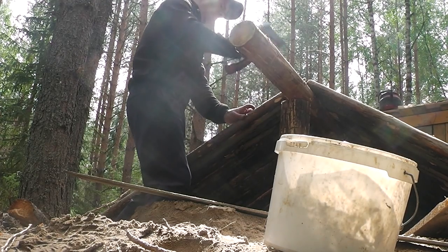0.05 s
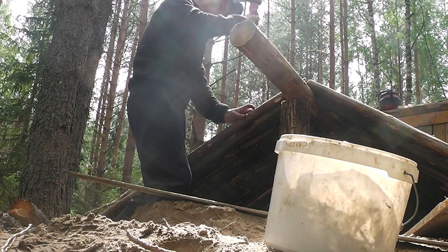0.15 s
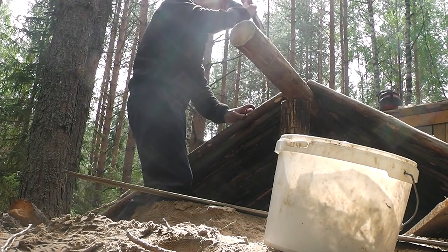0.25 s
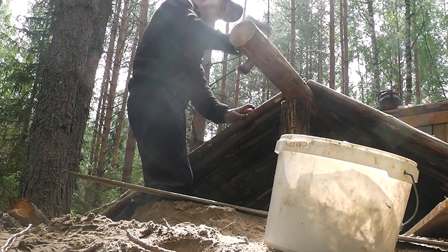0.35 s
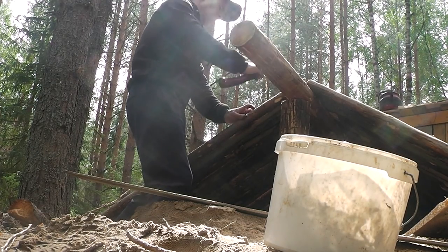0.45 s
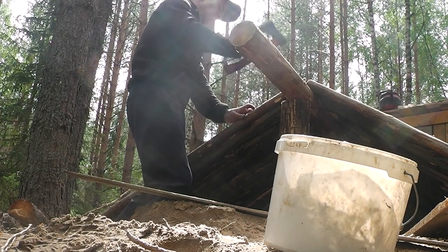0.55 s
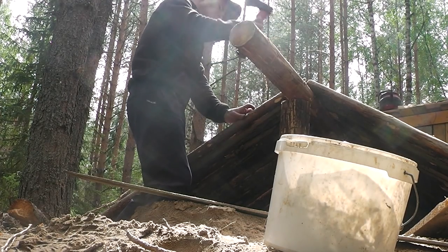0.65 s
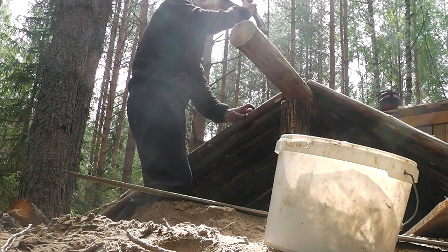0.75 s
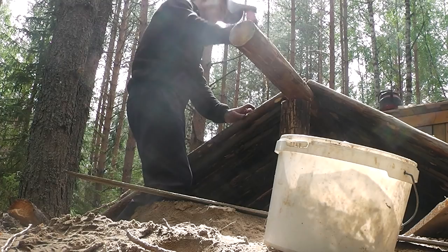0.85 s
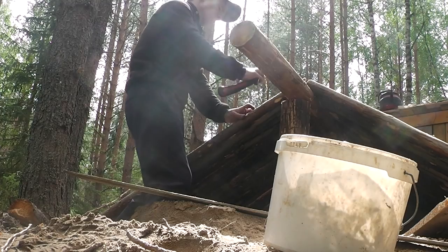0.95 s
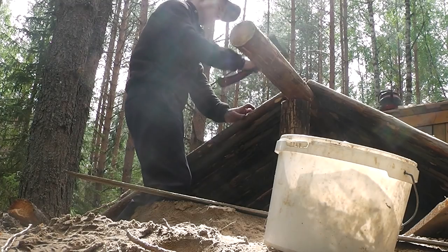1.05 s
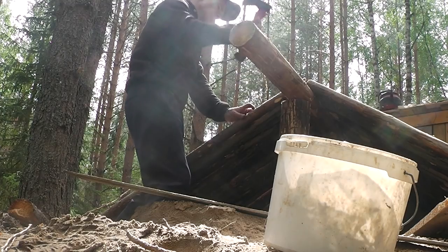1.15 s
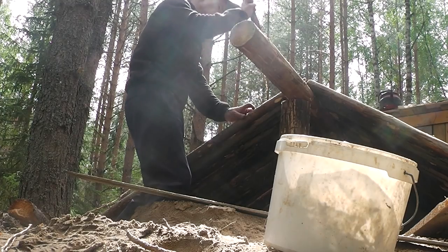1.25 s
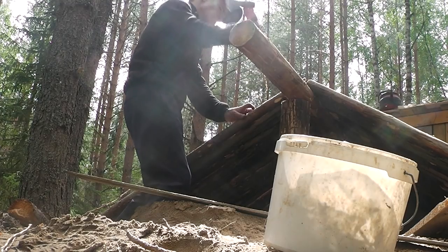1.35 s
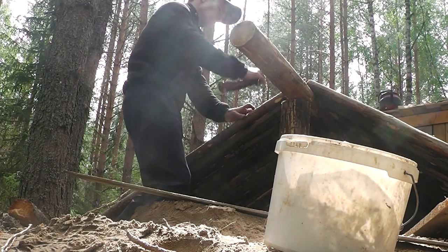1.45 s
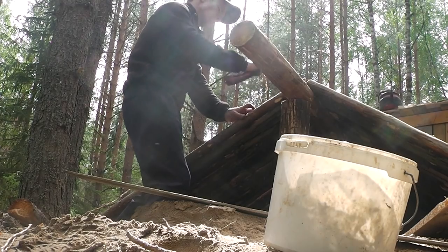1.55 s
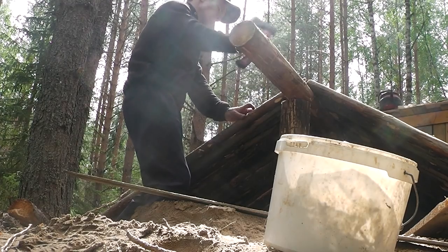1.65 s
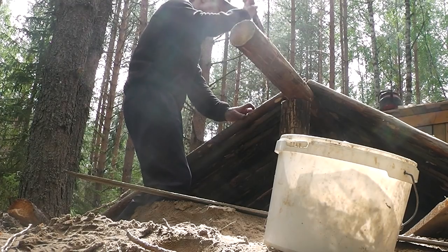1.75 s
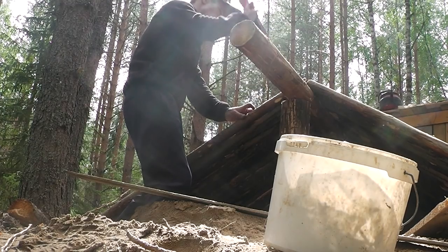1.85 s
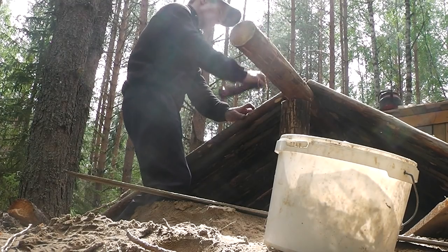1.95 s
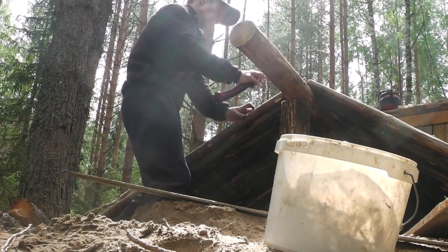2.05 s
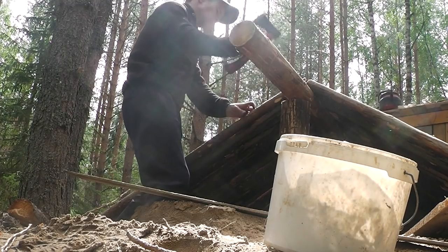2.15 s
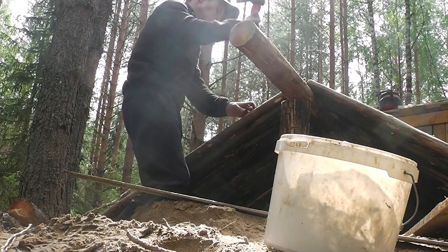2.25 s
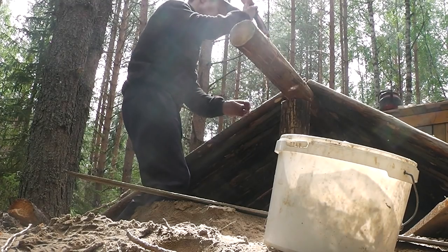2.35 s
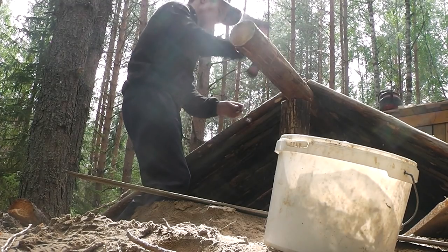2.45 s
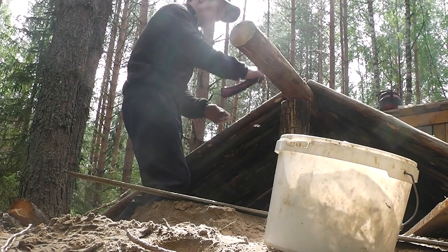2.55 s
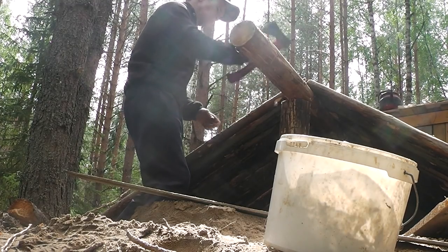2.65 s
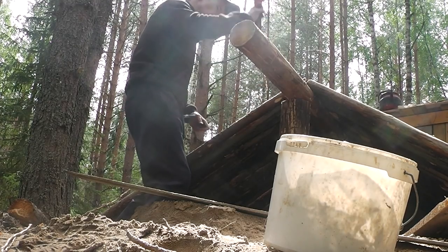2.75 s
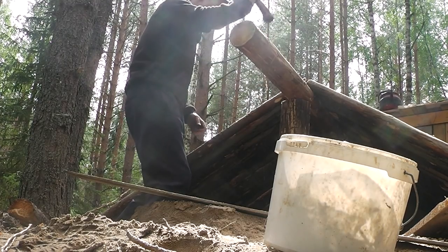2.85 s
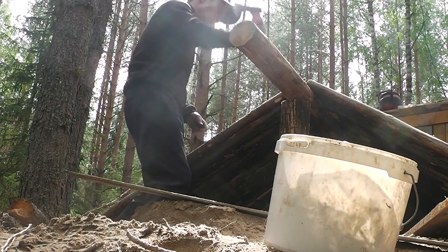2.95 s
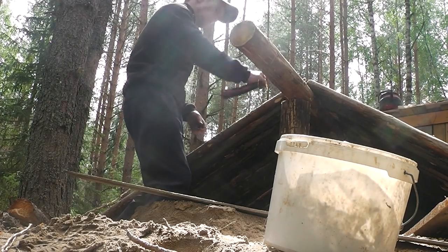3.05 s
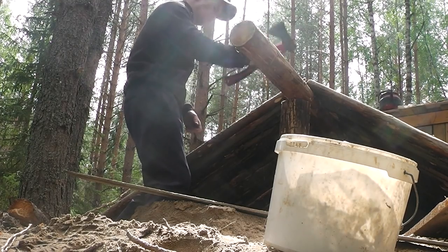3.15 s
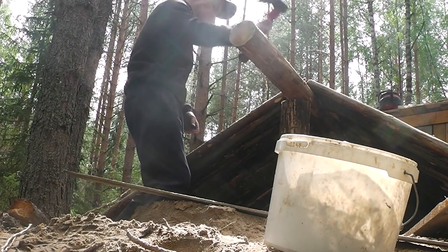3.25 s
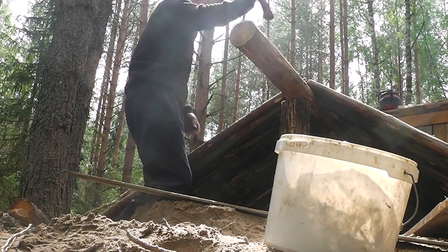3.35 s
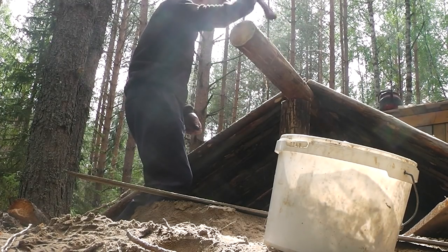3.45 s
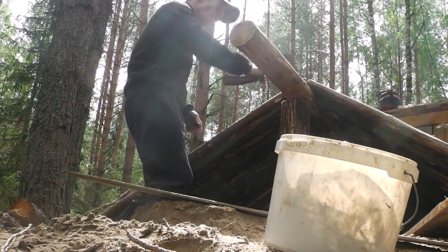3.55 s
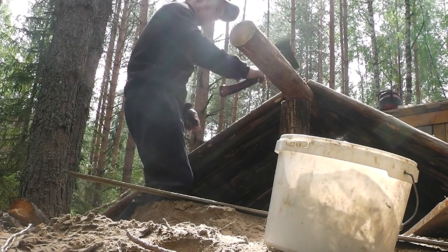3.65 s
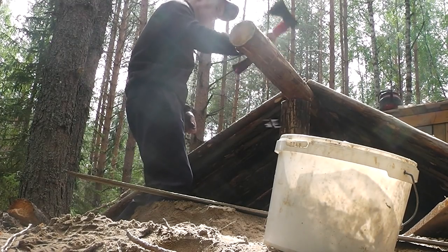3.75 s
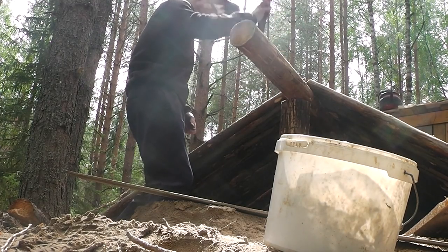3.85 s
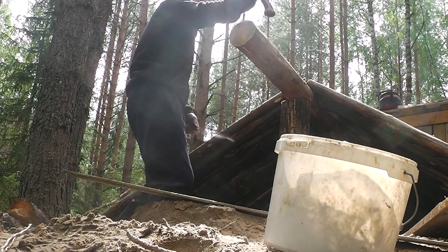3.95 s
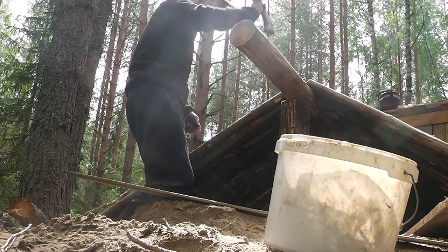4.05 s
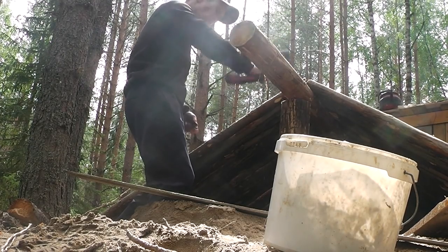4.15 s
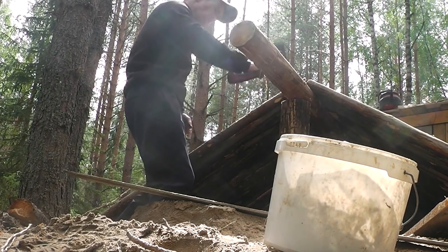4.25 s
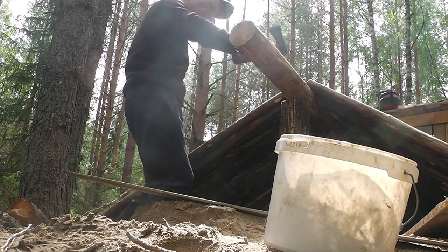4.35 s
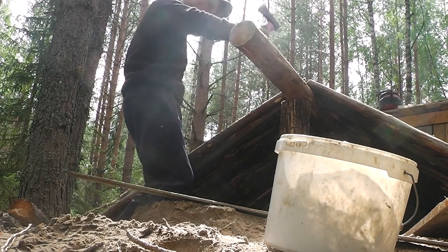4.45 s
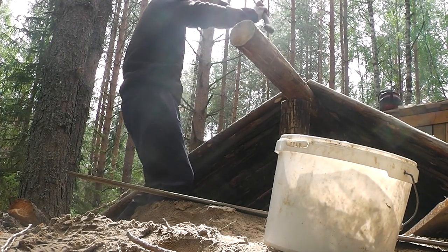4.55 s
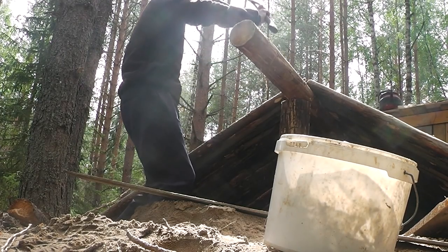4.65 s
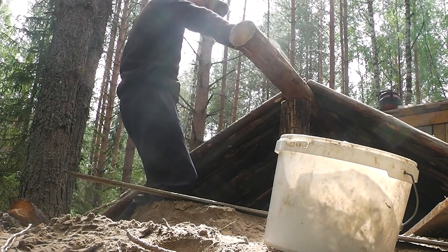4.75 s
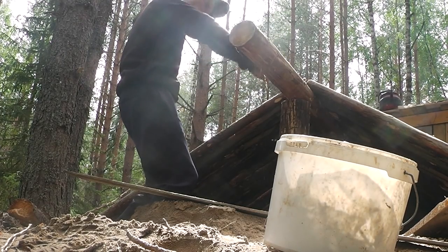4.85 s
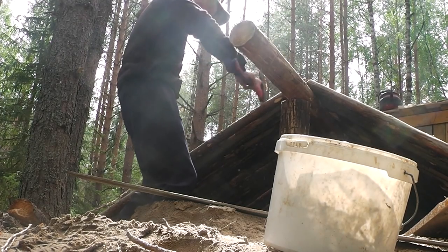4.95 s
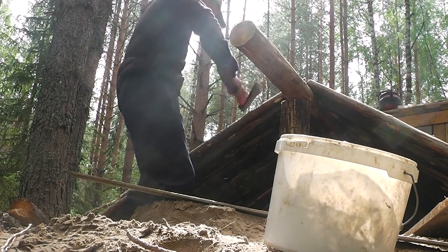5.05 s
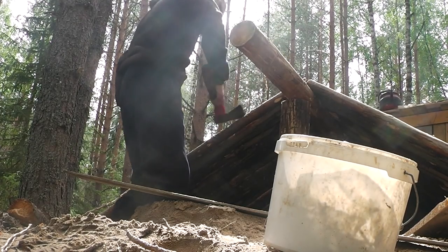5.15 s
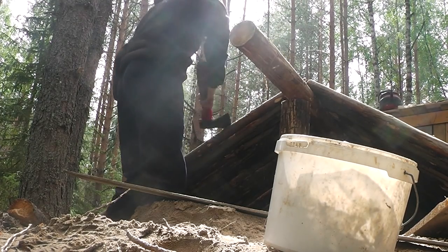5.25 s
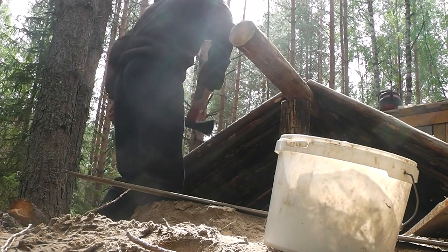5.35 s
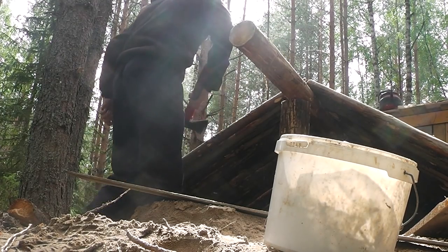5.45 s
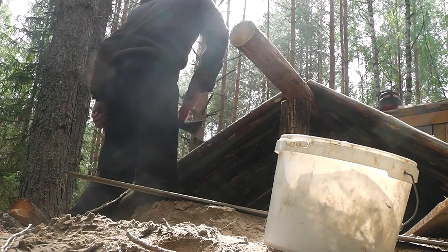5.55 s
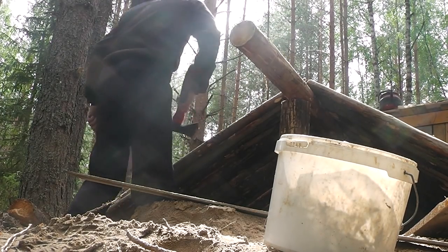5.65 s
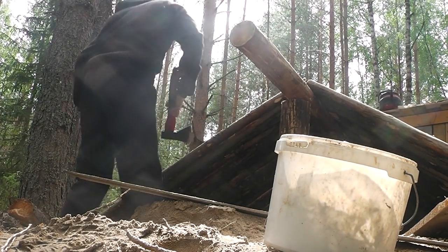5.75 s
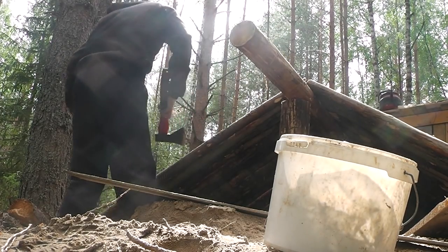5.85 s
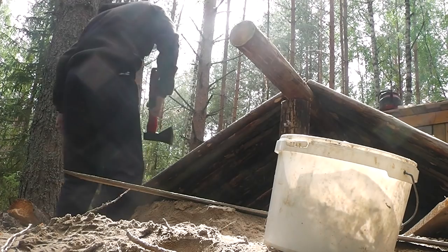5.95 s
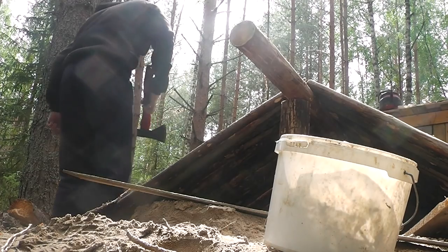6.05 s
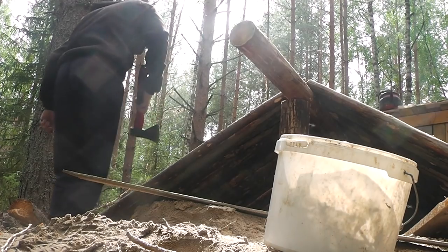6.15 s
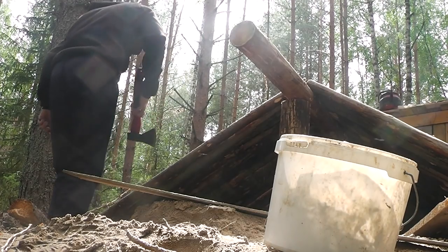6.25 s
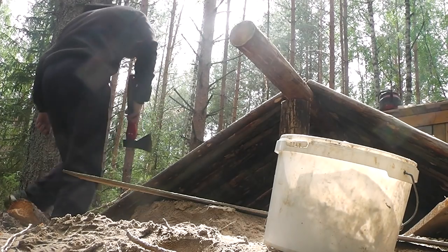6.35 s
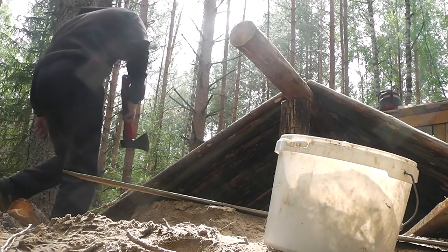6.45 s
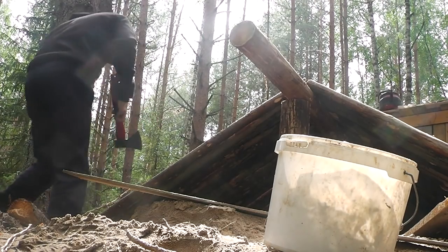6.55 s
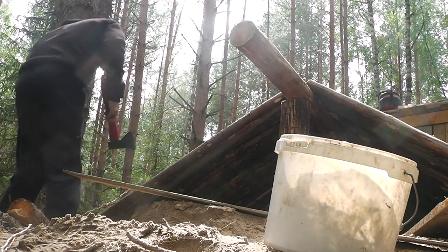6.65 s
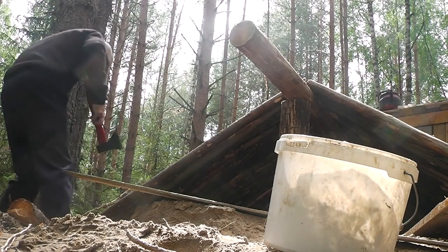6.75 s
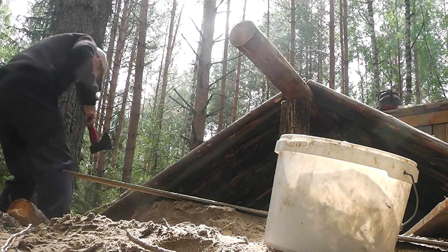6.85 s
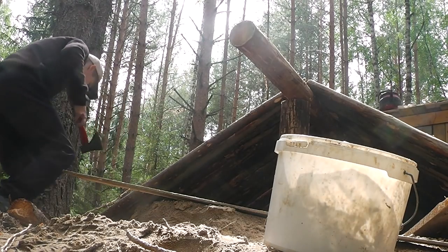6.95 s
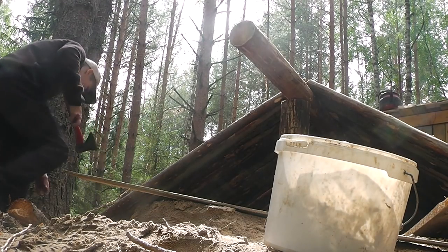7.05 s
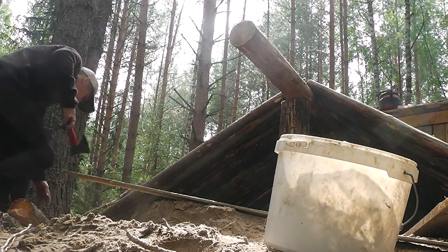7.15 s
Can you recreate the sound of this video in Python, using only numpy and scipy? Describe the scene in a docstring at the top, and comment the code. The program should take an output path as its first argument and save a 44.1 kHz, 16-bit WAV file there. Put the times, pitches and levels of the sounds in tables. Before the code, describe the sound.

Close outdoors in a quiet forest, a hatchet strikes a solid log ten times at roughly half-second intervals, each blow a sharp crack with woody ring and low boom. Middle blows clink with steel. The last, slightly delayed, splits with a bright snap; a chip thuds, the hatchet softly knocks timber and chatters, then faint footfalls press the litter. Trees hush and echo.

```python
"""A hatchet strikes the ridge log of a low timber hut in a pine forest, ten times, about twice a second.
Each blow sums a bell-shaped thump, a crack of shaped noise, ringing modes of wood and steel, a shudder and a boom.
Then a cut chip thuds down, the lowered hatchet knocks the timber once, softly, and chatters, and three footfalls
of filtered noise press the forest litter; small bright snaps fall throughout, during the blows and after them.
Hut, trunks and deep forest answer with decaying noise echoes; a steady hush of trees surrounds the microphone."""
import sys
import numpy as np
from scipy import signal
from scipy.fft import rfft, irfft
from scipy.io import wavfile
from scipy.ndimage import uniform_filter1d, minimum_filter1d

SR = 44100
rng = np.random.default_rng(int(sys.argv[2]) if len(sys.argv) > 2 else 0)


def output_pcm(signal):
    """Save a mono or channel-first signal as 16-bit PCM at the path in sys.argv[1].

    Samples are clipped to [-1, 1] before scaling.
    """
    pcm = np.clip(np.atleast_2d(signal).T, -1, 1) * 32767
    wavfile.write(sys.argv[1], SR, np.round(pcm).astype(np.int16))


N = 317520
LEAD_IN = SR // 10   # samples ahead of time zero, where the first blow already falls

# Modes of the steel hatchet head. Each row: frequency in Hz, level in dB, t60 in seconds.
STEEL = [(4957, -41, .23), (9109, -45, .23)]
# Side against mid for sound from the hut. Each row: frequency in Hz, level in dB.
WIDTH = [(60, -29.5), (300, -25), (1000, -25), (3000, -17.5), (8000, -13.5), (11000, -7), (14000, -2)]


def hatchet():
    """Each blow drives the log, tears its fibres, shakes the hut and sets the steel head ringing."""
    # Blows on the log. Each row: time in seconds, bite of the blade in dB, ring of the log in dB,
    # kick-back share from 0 to 1, hollowness in dB, ring of the steel in dB.
    blows = [(-0.024, -0.5, 4.5, 0.86, -1, -19.5), (0.5035, 4.5, 10.5, 1, -4.5, -15),
             (1.0138, 4.5, 11.5, 0.58, -0.5, -9), (1.5334, 9.5, 10.5, 0.4, -4, 13.5),
             (2.0498, 11.5, 7.5, 0.15, -14, 19), (2.5880, 7.5, 12, 0, -14.5, 2),
             (3.1181, 6, 10.5, .2, -11, -2.5), (3.6581, 9, 14.5, 0, -7.5, -14),
             (4.2361, 7, 10.5, 0.29, 8.5, -11), (4.8786, 5, 12.5, 1, 8, -19)]
    # Bright zings that hang among the trees. Each row: start in seconds, pitch in Hz, level in dB.
    zings = [(-0.024, 5040, -49), (0.5033, 5590, -39.5), (1.012, 6310, -43)]
    # Level of the treble. Each row is one side, left then right: gain in dB.
    treble_pan_db = [
        [0.26],
        [0.87],
    ]
    treble_pan = from_db(treble_pan_db)
    crack_db, shudder_db = 2.0, -46.5   # against the bite
    # Upper wood modes in a clean cut; a full kick-back raises them and shakes the roof timbers harder.
    bright_db, kick_bright_db, kick_rattle_db = -3.5, 6.5, 5.5
    # Crack tilt in dB/octave: at first, lost as the notch deepens, lost besides as the last blow breaks through.
    first_tilt_db, dulling_db, split_dulling_db = 4.0, 3.5, 4.5
    boom_db, boom_loss_db = -38, 7.5   # the boom weakens as the notch deepens
    high_steel_db = -20

    out = np.zeros((2, N + LEAD_IN))
    notch_depths = np.linspace(0, 1, len(blows))
    for depth, (s, bite_db, ring_db, kick, hollow_db, steel_db) in zip(notch_depths, blows):
        start = s - .002   # the thump is centred 2 ms into its sound
        bite = from_db(bite_db)
        tilt_db = first_tilt_db - dulling_db * depth - split_dulling_db * (depth == 1)
        tearing = crack(fibres(tilt_db, patchy_db=2.5), t60=.026)
        steel_gains_db = np.array([steel_db, high_steel_db])
        add(out, start, bite * thump(contact_ms=0.32, kick=kick, kick_after_ms=4.8447))
        add(out, start - .0003, bite * treble_pan * from_db(crack_db) * tearing)
        add(out, s, timber(ring_db, hollow_db, bright_db + kick_bright_db * kick))
        add(out, s, bite * from_db(kick_rattle_db * kick) * rattle())
        add(out, s, bite * from_db(shudder_db) * shudder())
        add(out, s, from_db(boom_db - boom_loss_db * depth) * boom())
        add(out, s, treble_pan * ring(STEEL, steel_gains_db, spread_db=1, detune=0))
    for s, hz, db in zings:
        add(out, s, from_db(db) * zing(hz))
    return out


def thump(contact_ms, kick, kick_after_ms):
    """A bell-shaped force radiates as its second derivative; the log kicks back just after. Centred on 2 ms."""
    ms = np.arange(SR // 80) * 1000 / SR - 2
    first = (ms / contact_ms) ** 2
    second = ((ms - kick_after_ms) / contact_ms) ** 2
    blow = (first - 1) * np.exp(-first / 2)
    kick_back = (second - 1) * np.exp(-second / 2)
    return blow + kick * kick_back


def fibres(tilt_db, patchy_db, count=45):
    """Each blow tears other fibres, so each crack has peaks and dips of its own."""
    # Mean spectrum of the crack before tilt. Each row: frequency in Hz, relative level in dB.
    crack_spectrum = [(700, 5.5), (1500, 14), (2100, 6), (2800, 3.5), (4000, 6), (6000, 7.5), (7600, 10),
                      (8300, 5.5), (9000, 14.5), (9700, 7.5), (11000, 5), (13500, -4.5), (16000, -15.5)]
    hz, db = np.transpose(crack_spectrum)
    grid = np.linspace(hz[0], hz[-1], count)
    smooth = np.interp(np.log(grid), np.log(hz), db) + tilt_db * np.log2(grid / 7000)
    return np.transpose([grid, smooth + patchy_db * rng.standard_normal(count)])


def crack(spectrum, t60, size=2048, count=3):
    """A click scattered over a few ms; its spectrum stays smooth. Starts after 2 ms."""
    t = np.arange(size) / SR - .002
    shape = (t > 0) * fade(np.abs(t), t60)
    x = rng.standard_normal((2, size)) * np.sqrt(shape)
    for _ in range(count):   # shorten in time, then flatten the spectrum, keeping only the phase
        x = irfft(np.exp(1j * np.angle(rfft(x * np.sqrt(shape)))))
    mid, side = colour(x, spectrum)
    stereo = mid + colour(side, WIDTH) * [[1], [-1]]
    return stereo * np.hanning(2 * size)[size:]


def timber(ring_db, hollow_db, bright_db):
    """The log rings; the spot that is hit weights its hollow low modes and its bright upper ones."""
    # Modes of the log and the roof it rests on. Each row: frequency in Hz, level in dB, t60 in seconds.
    wood = [(81.9, -30, 0.15), (128, -31.5, 0.12), (194.65, -31.5, 0.078), (266.53, -34.5, 0.15),
            (347.8, -27.5, 0.087), (409.45, -26, 0.11), (474.3, -45, 0.27), (565.6, -21, 0.11),
            (696, -48, 0.09), (818, -23, 0.049), (815.6, -31.5, 0.15), (910, -34, 0.086),
            (1023, -25.5, 0.063), (1031.9, -25.5, 0.1), (1262.6, -22.5, 0.042), (1395, -28, 0.032),
            (1498, -39, 0.092), (1685, -33.5, 0.051), (1924, -33, 0.023)]
    octaves = np.log2(np.array(wood)[:, 0])
    hollow_modes = np.exp(-((octaves - np.log2(320)) / 0.75) ** 2)
    bright_modes = np.clip(octaves - np.log2(560), 0, 1)
    gains_db = ring_db + hollow_db * hollow_modes + bright_db * bright_modes
    return ring(wood, gains_db, spread_db=1.5, detune=0.018)


def rattle():
    """The many damped modes of the roof timbers blur into a short rattle."""
    # Rattle of the roof timbers. Each row: frequency in Hz, relative level in dB.
    timbers = [(50, -12), (110, -2.5), (200, -7.5), (280, -11.5), (400, -7.5), (1000, 2.5), (1250, -4),
               (1500, -22), (1900, -17.5), (2500, -35), (4000, -47.5)]
    return from_db(-21.5) * burst(timbers, rise=0.00097, t60=0.16)


def shudder():
    """The whole hut shakes: a dying burst of low noise."""
    # Shudder of the hut. Each row: frequency in Hz, relative level in dB.
    hut = [(20, -14), (42, 4), (58, -2), (85, -4.5), (120, -15.5), (200, -35.5), (500, -55)]
    return burst(hut, rise=.004, t60=0.9)


def boom():
    """A low tone that sinks in pitch as it dies, drawn down to nothing at half a second."""
    start_hz, end_hz, sink_s = 94.8, 39.93, .04
    t = seconds(.5)
    hz = end_hz + (start_hz - end_hz) * np.exp(-t / sink_s)
    tone = np.sin(2 * np.pi * np.cumsum(hz) / SR)
    return tone * fade(t, 1.8) * (1 - (t / t[-1]) ** 2)


def zing(hz):
    """Noise narrowed to one bright peak swells and hangs."""
    return burst(resonance(hz, width_octaves=.17), rise=0.031, t60=0.7)


def resonance(hz, width_octaves, count=25):
    """The spectrum of one steep-sided peak."""
    return [(hz * 2 ** away, -20 * np.log10(1 + (away / width_octaves) ** 4))
            for away in np.linspace(-1, 1, count)]


def ring(modes, gains_db, spread_db, detune):
    """Struck modes; strength, and pitch by the detune share, vary a little with the spot that is hit."""
    t = seconds(0.46)
    hz, db, t60 = np.transpose(modes)
    chance = rng.standard_normal((2, len(hz)))
    height = from_db(db + gains_db + spread_db * chance[0]) * rng.choice([-1, 1], len(hz))
    pitch = hz * (1 + detune * chance[1])
    return height @ (np.sin(2 * np.pi * pitch[:, None] * t) * fade(t, t60[:, None]))


def knock(count=4):
    """The lowered hatchet bumps the timber without cutting: a dull knock, a clink and a brief chatter."""
    # Ring of the head in the knock: lower then upper steel mode, gain in dB.
    clink_db = [-19, 3]
    steel_db = np.array(clink_db)
    knock_s, knock_db = 5.2924, -14
    # The head chatters against the timber in even, light touches.
    chatter_after_s, chatter_gap_s, chatter_tick_db, chatter_loss_db = .034, .0195, -45.5, 17

    out = np.zeros((2, N + LEAD_IN))
    add(out, knock_s - .002, from_db(knock_db) * thump(contact_ms=0.48, kick=0, kick_after_ms=0))
    add(out, knock_s, timber(ring_db=7, hollow_db=-6, bright_db=-36))
    add(out, knock_s, from_db(knock_db) * rattle() + tick(-39.5))
    add(out, knock_s, ring(STEEL, steel_db, spread_db=1.5, detune=0))
    for s in knock_s + chatter_after_s + chatter_gap_s * np.arange(count):
        add(out, s, tick(chatter_tick_db))
        add(out, s, ring(STEEL, steel_db - chatter_loss_db, spread_db=4, detune=0))
    return out


def litter(count=7):
    """Small bright snaps, a cut chip and feet that thud and scuff, and a faint grainy rustle."""
    # Small bright snaps: twigs, chips, and a log fibre at the last blow.
    # Each row: start in seconds, level in dB.
    snaps = [(2.028, -38.5), (4.8755, -12), (5.0057, -38.5), (5.015, -38.5), (5.7389, -42), (6.204, -51)]
    # Thuds on soft ground: the cut chip lands, then three footfalls.
    # Each row: start in seconds, thud level in dB, scuff level in dB.
    landings = [(5.005, -30, -29), (6.201, -44, -43.5), (6.331, -62, -47), (6.721, -47, -39.5)]
    # Feet and clothes brushing the litter. Each row: start in seconds, length in seconds, level in dB.
    rustles = [(5.621, 0.29, -62.5), (5.858, 0.12, -60)]
    weight_after_s = 0.0159   # the weight lands just after the first touch
    brush_s, brush_db = .06, -62.5   # every landing brushes the litter

    out = np.zeros((2, N + LEAD_IN))
    # Fainter snaps come at random.
    faint = [(rng.uniform(0, N / SR), rng.normal(-57, 3)) for _ in range(count)]
    for s, db in snaps + faint:
        add(out, s, tick(db))
    for s, thud_db, scuff_db in landings:
        add(out, s, from_db(scuff_db) * scuff())
        add(out, s + weight_after_s, from_db(thud_db) * thud())
    landing_brushes = [(landing[0] - brush_s / 2, brush_s, brush_db) for landing in landings]
    for s, length, db in rustles + landing_brushes:
        add(out, s, rustle(length, db))
    return out


def tick(db):
    """A tiny bright snap: noise that starts at once and dies within hundredths of a second."""
    # Spectrum of a small snap. Each row: frequency in Hz, relative level in dB.
    snap = [(1000, -21), (3000, -18), (6000, -13.5), (10000, 4), (16000, -7.5)]
    return from_db(db) * burst(snap, rise=0.00012, t60=0.02)


def scuff():
    """Something scrapes the ground as it lands: a burst of noise with a sharp onset."""
    # Scuff on the ground. Each row: frequency in Hz, relative level in dB.
    scrape = [(60, 8.5), (200, 2), (450, 7.5), (800, -3), (1500, -12.5), (2600, -54), (8000, -34),
              (16000, -48)]
    return burst(scrape, rise=0.0007, t60=0.12)


def thud():
    """Weight lands on soft ground: a low burst with a rounder onset."""
    # Thud of the weight. Each row: frequency in Hz, relative level in dB.
    weight = [(25, -38), (70, 12), (130, 9.5), (250, -10), (600, -78), (2000, -48)]
    return burst(weight, rise=0.0041, t60=0.16)


def rustle(length, db):
    """Brushed litter: noise whose level flickers in random grains under a smooth swell."""
    # Brushing through litter. Each row: frequency in Hz, relative level in dB.
    brush = [(400, 8.5), (1200, 15), (1800, -3.5), (2700, -7.5), (6000, -9), (10000, -2), (16000, -17.5)]
    size = int(length * SR)
    grains = uniform_filter1d(rng.standard_normal(size), size=100)
    flicker = from_db(db + 4 * grains / grains.std())
    return flicker * np.hanning(size) * noise(brush, size, wider_db=0)


def forest(x):
    """The hut and ground answer first, then the near trunks, then the deep forest."""
    # Echo against the direct sound, near to far. Each row: frequency in Hz, strength in dB.
    hut_echo = [(60, -14.5), (250, -4.5), (600, -12.5), (1000, -11), (1700, -2.5), (2800, -17.5),
                (5000, -9), (9000, -12), (15000, -12.5)]
    trunk_echo = [(60, -7.5), (250, -32), (600, -34.5), (1100, -24), (1800, -14.5), (2800, -26),
                  (4500, -17.5), (6500, -20.5), (10000, -30), (15000, -28.5)]
    far_echo = [(60, -26), (250, -37), (600, -35.5), (1000, -30), (1700, -22), (2700, -33.5), (4500, -31.5),
                (7000, -40), (12000, -59.5)]
    response = (echoes(hut_echo, build_up=0.0047, t60=.11, wider_db=-0.5)
                + echoes(trunk_echo, build_up=0.041, t60=0.52, wider_db=1.0)
                + echoes(far_echo, build_up=0.25, t60=1.42, wider_db=12.0))
    return signal.fftconvolve(x, response, axes=1)[:, :x.shape[1]]


def echoes(spectrum, build_up, t60, wider_db):
    """Countless reflections that thicken and die away; the spectrum gives their total energy."""
    t = seconds(3)
    shape = (1 - np.exp(-(t / build_up) ** 2)) * fade(t, t60)
    return diffuse(spectrum, len(t), wider_db) * shape / np.sqrt(np.sum(shape ** 2))


def beside(x):
    """A faint reflection from close beside the microphone makes the two sides differ a little."""
    delay_s, side_db = .002, -22.5
    at = np.arange(x.shape[1])
    late = np.interp(at - delay_s * SR, at, x.mean(axis=0))
    return x + from_db(side_db) * late * [[1], [-1]]


def air():
    """The faint hush of the trees all around: steady, wide noise."""
    # Hush of the trees. Each row: frequency in Hz, relative level in dB.
    hush = [(20, 1), (45, 1), (100, -7), (200, -9.5), (400, -7), (1050, -9.5), (1600, -16), (2700, -33),
            (3300, -34), (4200, -25), (7000, -26.5), (10500, -26.5), (16000, -32.5)]
    return from_db(-56) * noise(hush, N, wider_db=25.0)


def burst(spectrum, rise, t60):
    """Noise that swells quickly and dies."""
    t = seconds(.6)
    return noise(spectrum, len(t), wider_db=3.5) * (1 - np.exp(-t / rise)) * fade(t, t60)


def noise(spectrum, size, wider_db):
    """Diffuse noise of rms 1."""
    x = diffuse(spectrum, size, wider_db)
    return x / x.std()


def diffuse(spectrum, size, wider_db):
    """Coloured stereo noise; the more it surrounds the listener, the less alike the two sides."""
    mid, side = colour(rng.standard_normal((2, size)), spectrum)
    side_width = [(hz, min(db + wider_db, 0)) for hz, db in WIDTH]
    return mid + colour(side, side_width) * [[1], [-1]]


def colour(x, spectrum):
    """Shape noise by a table of Hz and dB, read along log frequency."""
    hz, db = np.transpose(spectrum)
    size = x.shape[-1]
    bins = np.maximum(np.arange(size // 2 + 1) * SR / size, 1)
    gain = from_db(np.interp(np.log(bins), np.log(hz), db))
    return irfft(rfft(x) * gain, size)


def from_db(db):
    """Decibels to gain."""
    return 10 ** (np.asarray(db) / 20)


def seconds(length):
    """A time axis."""
    return np.arange(int(length * SR)) / SR


def fade(t, t60):
    """Exponential decay, 60 dB down after t60."""
    return np.exp(-np.log(1000) * t / t60)


def add(track, s, sound):
    """Mix a sound into a stereo track that starts a little before time zero."""
    at = max(int(round(s * SR)) + LEAD_IN, 0)
    part = sound[..., :track.shape[1] - at]
    track[:, at:at + part.shape[-1]] += part


def scene():
    """Blows, knock and litter with their echoes, over the faint hush of the trees all around."""
    near = hatchet() + knock() + litter()
    return beside(near + forest(near))[:, LEAD_IN:] + air()


def limiter(x, ceiling_db, release_db_per_s):
    """The gain drops just ahead of a loud blow and creeps back, so hush and echo swell between blows."""
    power = uniform_filter1d(np.mean(x ** 2, axis=0), size=88)
    over = np.maximum(10 * np.log10(np.maximum(power, 1e-12)) - ceiling_db, 0)
    recovery = release_db_per_s * np.arange(N) / SR
    cut = np.maximum.accumulate(over + recovery) - recovery
    early = minimum_filter1d(-cut, size=600)   # reaches the full cut ahead of the blow
    return x * from_db(uniform_filter1d(early, size=150))


def record(dry):
    """A limiter holds the blows down, the highest peaks are rounded off and the top is cut."""
    x = limiter(dry, ceiling_db=-8.5, release_db_per_s=17.5)
    held = x / (1 + (x / .86) ** 8) ** (1 / 8)
    cutoff_hz = 16200
    top_cut = signal.ellip(10, .1, 80, cutoff_hz, fs=SR, output="sos")
    return signal.sosfilt(top_cut, held)


dry = scene()
out = record(dry)
output_pcm(out)
```